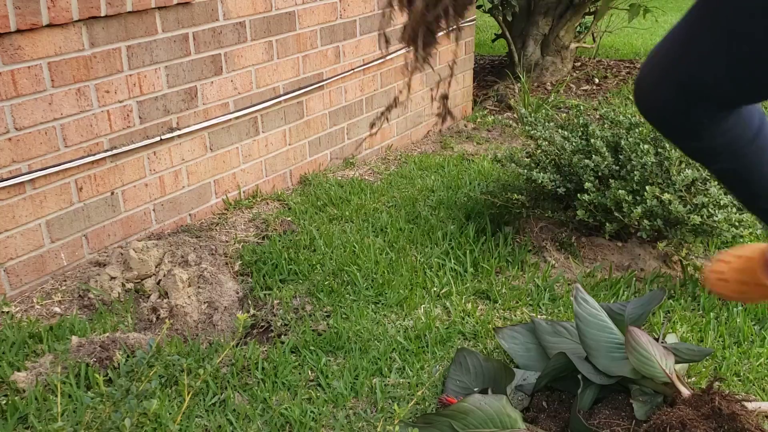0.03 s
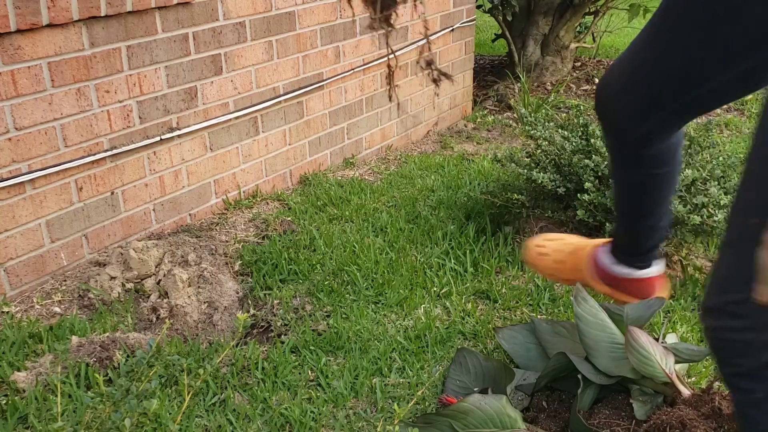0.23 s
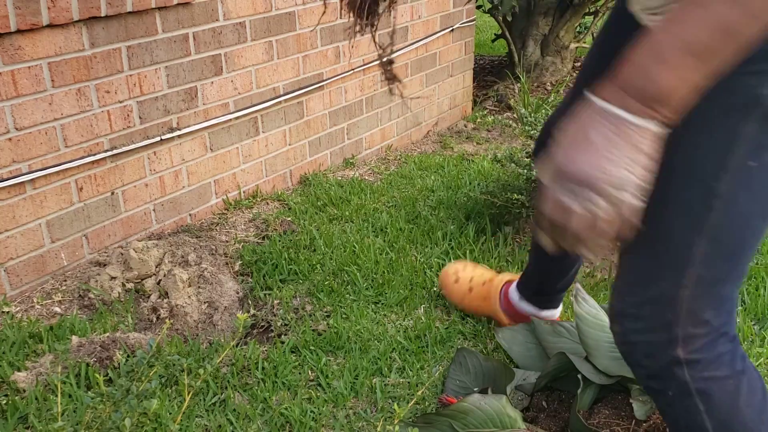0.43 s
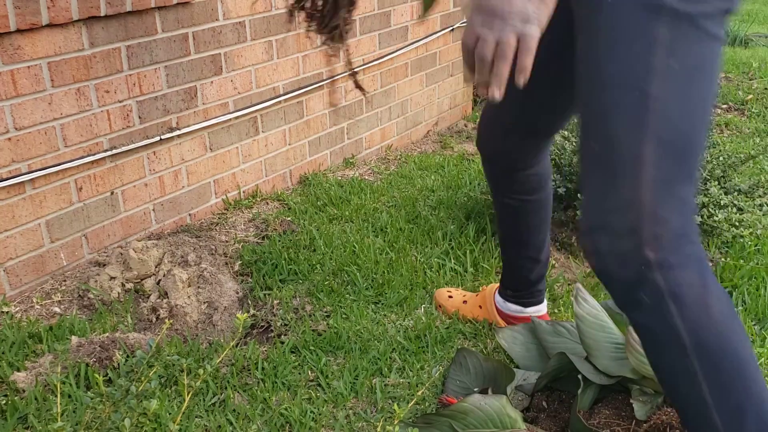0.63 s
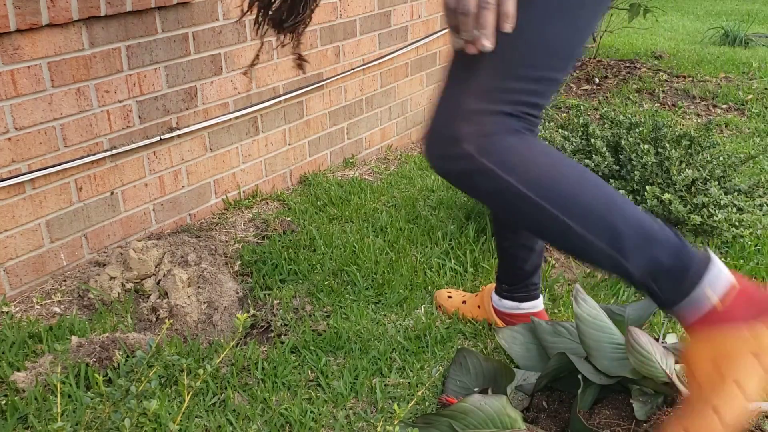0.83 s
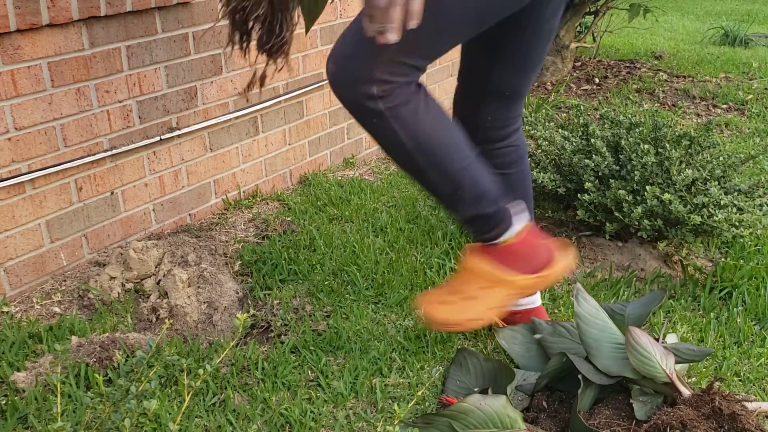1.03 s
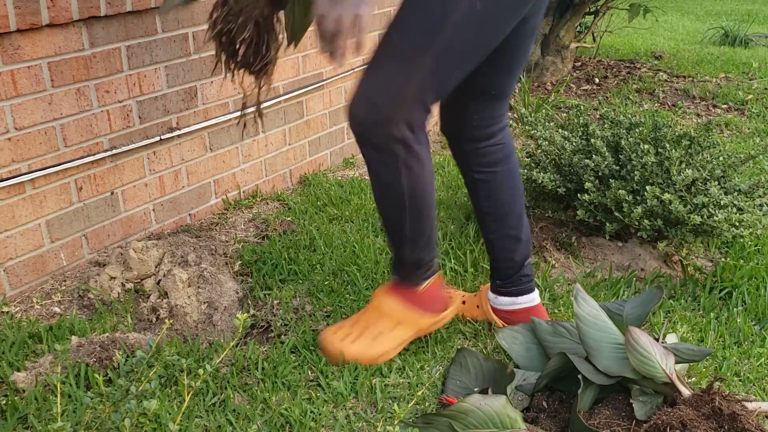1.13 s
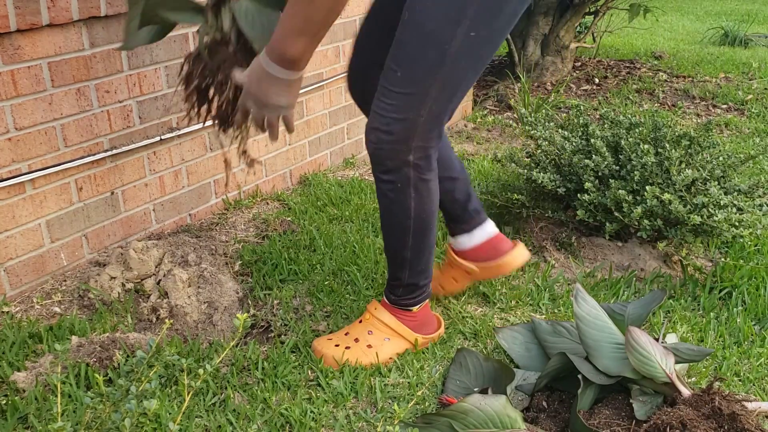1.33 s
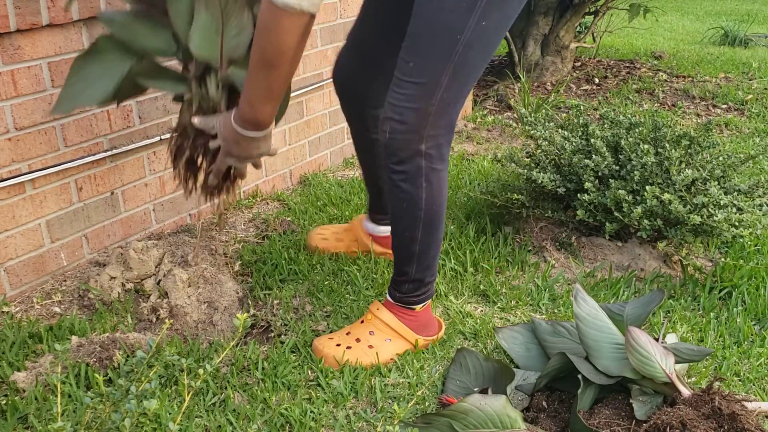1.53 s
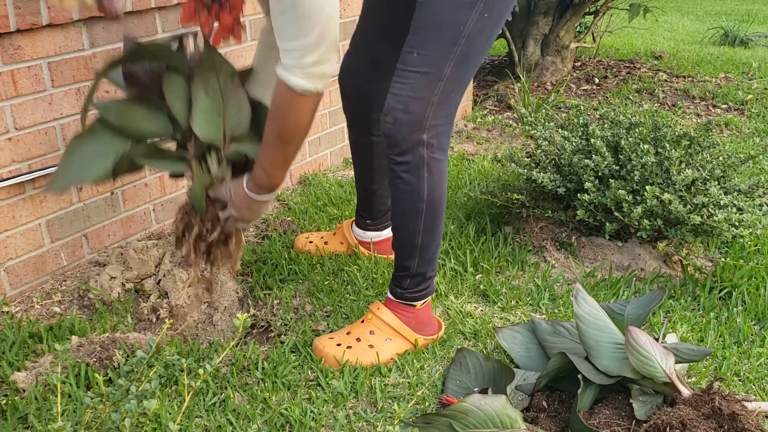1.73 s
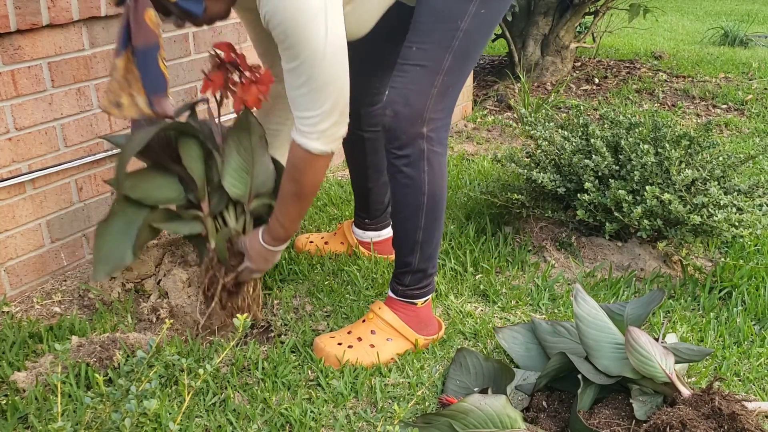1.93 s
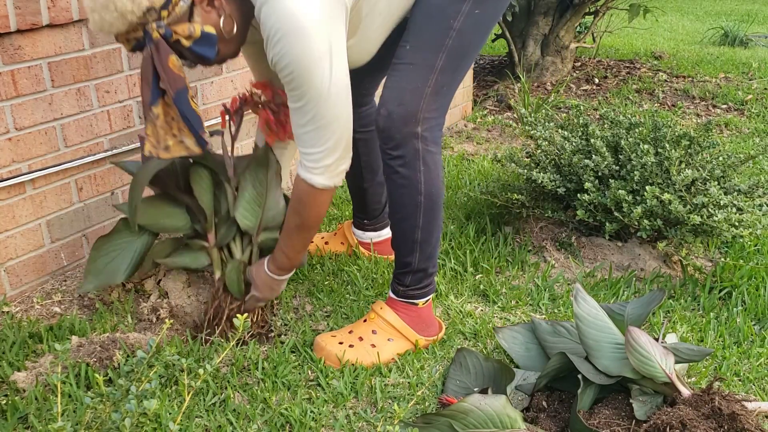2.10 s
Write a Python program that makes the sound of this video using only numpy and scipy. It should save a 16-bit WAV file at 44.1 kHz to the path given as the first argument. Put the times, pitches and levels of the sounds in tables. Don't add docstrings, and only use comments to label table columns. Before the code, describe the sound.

Bright water spray from a garden sprinkler sweeps in and patters on leaves, with faint grass rustles

```python
import sys
import numpy as np
from scipy import signal
from scipy.fft import rfft, irfft, next_fast_len
from scipy.io import wavfile
from scipy.ndimage import uniform_filter1d, map_coordinates

SR = 44100
rng = np.random.default_rng(int(sys.argv[2]) if len(sys.argv) > 2 else 0)


def dump_mix(stems):
    frames = np.atleast_2d(stems).T
    limited = np.clip(frames, -1, 1)
    pcm = np.round(limited * 32767).astype(np.int16)
    wavfile.write(sys.argv[1], SR, pcm)


def boost(x):
    u = np.asarray(x, float) / 20
    return 10 ** u


N = 95476
TIME_S = np.arange(N) / SR
FRAME, HOP = 512, 128
HZ = np.fft.rfftfreq(FRAME, 1 / SR)[:, None]


def unit(x):
    return x / np.sqrt(np.mean(np.abs(x) ** 2) + 1e-20)


def along(points, hz):
    f, value = np.transpose(points)
    return np.interp(np.log(hz + 1), np.log(f + 1), value)


def column(rows, s, axis=1):
    columns = np.transpose(rows)
    return np.interp(s, columns[0], columns[axis])


def wobble(rate):
    return map_coordinates(rng.standard_normal(size=400), [TIME_S * rate])


def filtered(x, response):
    m = next_fast_len(N + 8192)
    return irfft(rfft(x, m) * response(np.fft.rfftfreq(m, 1 / SR)), m)[..., :N]


def bump(hz, centre_hz, width_hz):
    return 1 / (1 + (2 * (hz - centre_hz) / width_hz) ** 2)


def patter(channels):
    drops_per_s, spread_db, drop_share = 4000, 2.5, .25
    shape = (channels, N)
    hit = rng.random(shape) < drops_per_s / SR
    size = boost(spread_db * rng.standard_normal(shape))
    drops = hit * size * rng.choice([-1, 1], shape)
    return np.sqrt(drop_share) * unit(drops) + np.sqrt(1 - drop_share) * rng.standard_normal(shape)


# (f/Hz, depth factor)
PATCH_DEPTH = [(500, 3.37), (3000, 3.77), (6000, 1.06), (12000, 1)]


def patchy_spectra(x, patchy_db):
    z = signal.stft(x, nperseg=FRAME, noverlap=FRAME - HOP)[2]
    field = rng.standard_normal(z.shape[-2:])
    field = uniform_filter1d(field, size=8, axis=0)
    field = uniform_filter1d(field, size=12, axis=1)
    return z * boost(patchy_db * along(PATCH_DEPTH, HZ) * unit(field))


def sound(z):
    return signal.istft(z, nperseg=FRAME, noverlap=FRAME - HOP)[1][..., :N]


# (f/Hz, level/dB per Hz)
MIST_COLOUR = [(350, -17.5), (700, -32), (1400, -29), (2000, -20), (2600, -18.5), (4500, -14.5),
               (8970, -12), (15700, -1.5)]


def mist():
    spray = patchy_spectra(patter(channels=2), patchy_db=0.4) * boost(along(MIST_COLOUR, HZ))
    level_db = -36 + 0.13 * wobble(7.2)
    return boost(level_db) * unit(sound(spray))


# (f/Hz, level/dB per Hz)
ROAR_COLOUR = [(12, -74), (20, -0.5), (54, -0.5), (124, -1.5), (251, -18.5), (387, -26), (677, -26.5),
               (1120, -25), (1500, -33.5), (1950, -55), (3300, -120)]
# (f/Hz, likeness 0 to 1)
RUMBLE_ALIKE = [(60, 0.86), (200, 1), (400, 1), (800, 0.083)]
# (f/Hz, width/Hz, level/dB)
HUMS = [(177.2, 9.6, -61.5), (233.8, 54, -62)]
DRONE_HZ = [55.16, 117]
DRONE_WANDER_HZ = [2.63, 4.47]
# (t/s, low drone level/dB, high drone level/dB)
DRONES = [(0.0, -35, -42.5), (0.09, -73, -84), (0.17, -74, -75), (0.23, -56, -44), (0.3, -39.5, -48),
          (0.84, -51, -52), (0.91, -40, -45), (1.02, -50, -64), (1.06, -55, -50), (1.09, -58, -49.5),
          (1.23, -45, -47), (1.33, -56, -51), (1.36, -46, -48.5), (1.43, -42, -51), (1.54, -57, -61),
          (1.63, -52.5, -46.5), (1.74, -47, -52.5), (2.16, -82, -45)]


def rumble_pair(gain):
    def middle_and_side(hz):
        angle = np.arccos(np.clip(along(RUMBLE_ALIKE, hz), -1, 1)) / 2
        return gain(hz) * [np.cos(angle), np.sin(angle)]

    mid, side = filtered(rng.standard_normal((2, N)), middle_and_side)
    return unit(np.array([mid + side, mid - side]))


def rumble():
    roar = boost(-46 + 0.27 * wobble(12)) * rumble_pair(lambda hz: boost(along(ROAR_COLOUR, hz)))
    hums = 0
    for centre_hz, width_hz, db in HUMS:
        hums = hums + boost(db) * rumble_pair(lambda hz: bump(hz, centre_hz, width_hz))
    drones = 0
    for k, (hz, wander_hz) in enumerate(zip(DRONE_HZ, DRONE_WANDER_HZ)):
        pitch_hz = hz + wander_hz * wobble(14)
        level = boost(column(DRONES, TIME_S, axis=k + 1))
        drones = drones + level * np.sin(2 * np.pi * np.cumsum(pitch_hz) / SR)
    pan_db = -3.5
    return (roar + hums + 1.11 * drones) * boost([[pan_db / 2], [-pan_db / 2]])


# (t/s, level/dB, length/s, f/Hz, pan/dB with + to the left)
RUSTLES = [(0.087, -63.5, 0.031, 1850, 4), (0.11, -62, 0.11, 402, -5), (0.504, -61, 0.049, 520, -9),
           (0.574, -58, 0.057, 940, -2), (.73, -58.5, 0.073, 1350, -9), (1.023, -62, 0.046, 1020, -11),
           (1.244, -50.5, 0.041, 1390, -2.5), (1.264, -52, 0.13, 3020, 1), (1.226, -57.5, 0.037, 450, -3),
           (1.399, -56, 0.044, 1270, 0), (1.492, -58.5, 0.1, 444, -3), (1.617, -58.5, 0.092, 1110, 0),
           (2.109, -59.5, 0.011, 970, -10)]


def rustles():
    alike, width_octaves = .9, 0.58
    both, *own = rng.standard_normal((3, N))
    grains = (alike * both + np.array(own)) * boost(1.5 * wobble(150))
    out = 0
    for s, db, length, hz, pan in RUSTLES:
        band = unit(filtered(grains, lambda f: np.exp(-(np.log2((f + 1) / hz) / width_octaves) ** 2)))
        swell = np.exp(-((TIME_S - s) / length) ** 2)
        out = out + boost([[db + pan / 2], [db - pan / 2]]) * swell * band
    return out


# (t/s, level/dB)
JET = [(0, -62), (.3, -48), (.38, -38.5), (.46, -37), (.55, -31), (.68, -29.5), (.8, -29.5), (.95, -30.5),
       (1.2, -29.5), (1.45, -31), (1.62, -30), (1.75, -31), (1.9, -31.5), (2.16, -30.5)]
# (f/Hz, level/dB per Hz)
JET_COLOUR = [(700, -22), (1800, -27), (2600, -17.5), (4000, -14), (8000, -9), (11500, -4.5), (14500, 2),
              (15740, -0.3)]
# (f/Hz, level/dB)
RIGHT_PORT = [(2000, 0), (6000, 1.5), (8000, 4), (9500, 3.5), (11000, 4.5), (13200, 4), (14200, 7),
              (15700, 5)]
# (f/Hz, share 0 to 1)
JET_ALIKE = [(1000, .5), (2500, .7), (4000, .86), (5500, .86), (9000, .78), (15000, .62)]
# (t/s, delay/ms)
BEARING = [(0, .31), (.38, .303), (.62, .27), (1.34, .269), (1.6, .259), (1.67, .24), (1.82, .238),
           (1.95, .249), (2.16, .256)]
# (f/Hz, lag/radians)
BEND = [(3800, .3), (5200, .62), (6500, .4), (9000, .15), (15000, 0)]
# (t/s, level/dB, length/s)
SPLASHES = [
    (0.64, 3, .04),
    (0.804, 3.5, 0.027),
    (1.266, 1, 0.15),
    (1.482, 7.5, 0.11),
    (1.797, 5, 0.051),
    (1.975, 0, .04),
]


def jet():
    spray = patchy_spectra(patter(channels=3), patchy_db=0.6)
    shared, left, right = spray * boost(along(JET_COLOUR, HZ))
    t = np.arange(shared.shape[1]) * HOP / SR
    splash_db = sum(db * np.exp(-((t - s) / length) ** 2) for s, db, length in SPLASHES)
    shared = shared * boost(splash_db * bump(HZ, centre_hz=4000, width_hz=4500))

    alike = np.clip(along(JET_ALIKE, HZ), 0, 1)
    shared, own = np.sqrt(alike) * shared, np.sqrt(1 - alike)
    late_s = column(BEARING, t) / 1000
    lag = 2 * np.pi * HZ * late_s + along(BEND, HZ)
    left = shared * np.exp(-1j * lag) + own * left
    right = (shared + own * right) * boost(along(RIGHT_PORT, HZ))
    level_db = column(JET, TIME_S) + .3 * wobble(18) + .45 * wobble(33)
    return boost(level_db) * unit(sound(np.array([left, right])))


def scene():
    return mist() + rumble() + rustles() + jet()


def right_port_cavity(hz):
    ring = 1 + 1.75 * bump(hz, centre_hz=11770, width_hz=860)
    dip = 1 - 0.14 * bump(hz, centre_hz=12550, width_hz=470)
    return ring * dip


def top_cut(x):
    return signal.sosfilt(signal.butter(12, 15740, fs=SR, output="sos"), x)


def record(dry):
    top_hz, low_cut_hz = 15740, 31

    def band(hz):
        return (hz < top_hz) / (1 + (low_cut_hz / (hz + 1)) ** 6)

    left, right = dry
    right = filtered(right, right_port_cavity)
    return top_cut(filtered(np.array([left, right]), band))


dry = scene()
out = record(dry)
dump_mix(out)
```